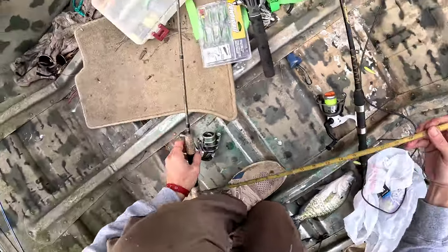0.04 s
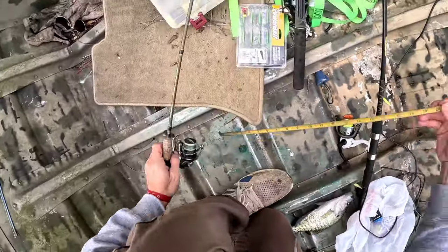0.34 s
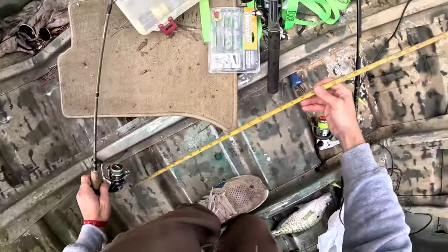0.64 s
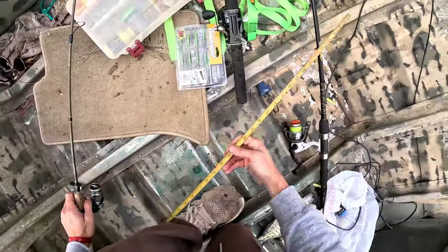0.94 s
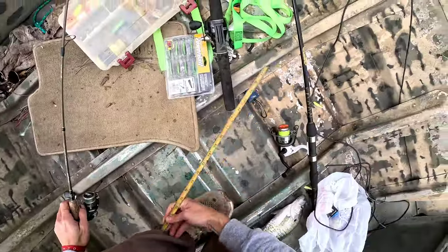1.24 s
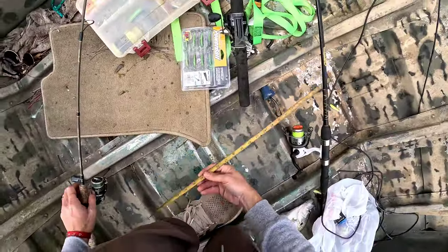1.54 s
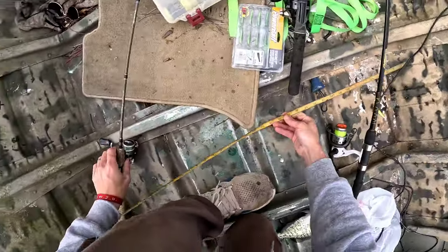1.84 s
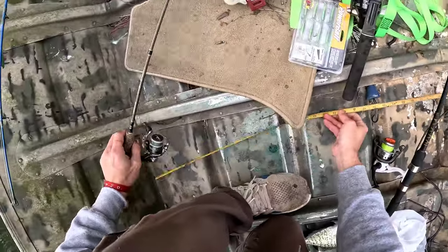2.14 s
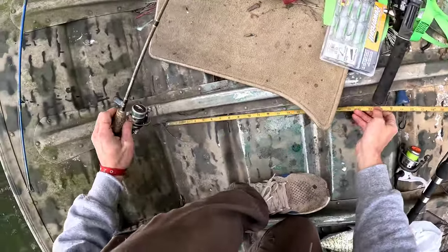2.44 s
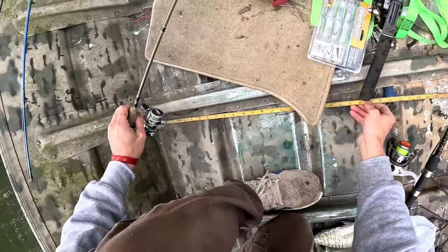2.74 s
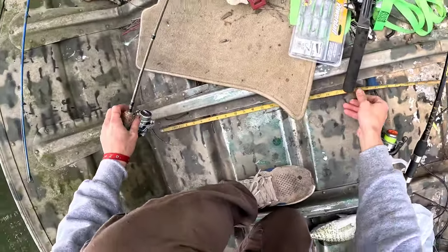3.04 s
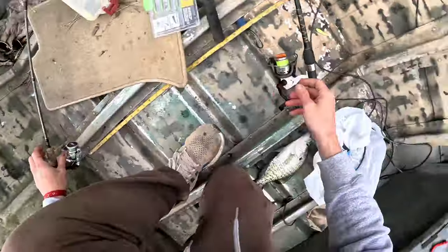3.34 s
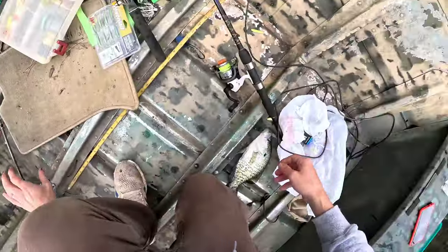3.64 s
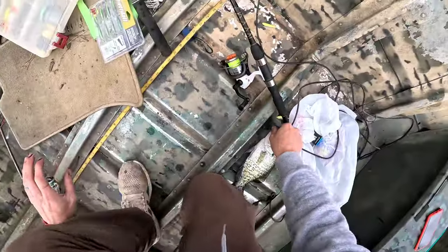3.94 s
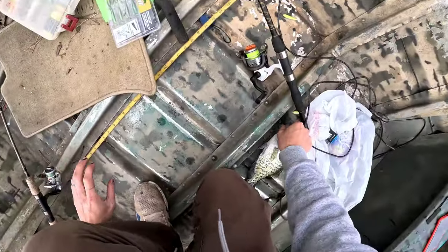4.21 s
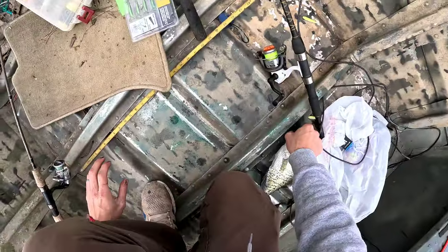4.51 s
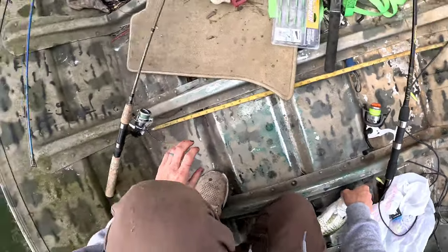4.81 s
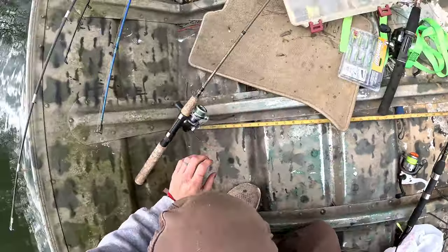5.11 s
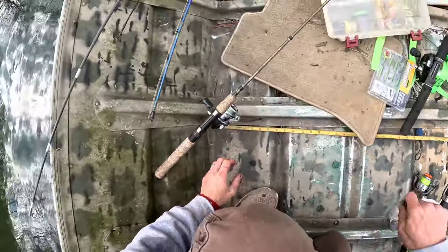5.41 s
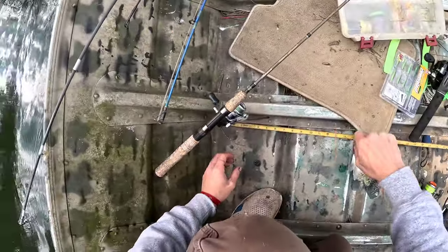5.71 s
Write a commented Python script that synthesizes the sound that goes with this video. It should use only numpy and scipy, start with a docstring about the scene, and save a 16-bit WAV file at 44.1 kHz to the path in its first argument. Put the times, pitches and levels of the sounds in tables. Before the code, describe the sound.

A steel tape measure snaps, buckles and scrapes across a small metal boat's floor, with hollow hull knocks and rustling sleeves.

```python
"""A steel tape measure is handled in a small metal boat, close by, over soft hiss and air rumble.
A far bird whistles first. The blade is pulled out, snapping and buckling in sinking tones; knocks
ring the hull and sleeves rustle. The blade slaps the floor, then scrapes over its ribs and grit.
From about 3 s the snaps thin out, and a rod, a shoe and a knee knock on the hollow hull."""
import sys
import numpy as np
from scipy import signal
from scipy.fft import rfft, irfft
from scipy.io import wavfile
from scipy.ndimage import uniform_filter1d

SR = 44100
rng = np.random.default_rng(int(sys.argv[2]) if len(sys.argv) > 2 else 0)


def persist_wave(psi):
    """Save psi, clipped to +-1, as 16-bit WAV."""
    counts = np.round(np.clip(psi, -1, 1) * 32767).astype(np.int16)
    wavfile.write(sys.argv[1], SR, np.atleast_2d(counts).T)


N = 258426
TIME_S = np.arange(N) / SR
EVENT_S = TIME_S[:SR // 2]

# Table levels are relative; each source adds its own gain.
# background, with two brief dips: (time [s], level [dB])
BACKGROUND = [(0, 4), (2.9, 9), (3.12, 7.5), (3.3, 0.5), (4.8, 7.5), (5.35, -0.5), (5.53, -8.5),
              (5.73, -11.5), (5.76, 3)]
# air rumble spectrum: (frequency [Hz], level [dB])
WIND_EQ = [(10, 5.5), (28, -7.5), (55, -3), (90, -1.5), (300, -25.5), (900, -70)]
# body sways push air at the microphone: (time [s], length [s], level [dB])
SWAYS = [(.5, 0.22, -39.5), (.71, 0.35, -33.5), (1.32, 0.1, -33), (1.75, 0.16, -32), (3.455, 0.022, -31.5),
         (3.55, 0.3, -34), (4.57, 0.27, -43)]
# bird notes: (time [s], length [s], level [dB], start [Hz], middle [Hz], end [Hz])
BIRD_NOTES = [(-.02, .1, -48, 2650, 2650, 3150), (.135, .05, -48, 3020, 2950, 2750),
              (.255, .055, -48, 2720, 2430, 2250)]
# arm movements: (time [s], length [s], level [dB])
SLEEVES = [(1.13, 0.52, -48.5), (1.9, 0.82, -43.5), (2.45, 0.21, -38), (3.23, 0.49, -45.5),
           (3.64, 0.17, -42.5), (3.72, 0.53, -50.5), (4.27, 0.29, -48), (5.72, 0.49, -53)]
# cloth hiss spectrum: (frequency [Hz], level [dB])
RUSTLE_EQ = [(1200, -23), (2800, -3), (5400, -7), (8500, -11.5), (11000, -27), (13500, -29), (16000, -62)]
# narrow resonance in the hiss: (frequency [Hz], width [Hz], level [dB])
RUSTLE_MODES = [(4880, 220, 1)]
# dull rubbing spectrum: (frequency [Hz], level [dB])
RUB_EQ = [(60, 2.5), (150, 5), (300, -0.5), (650, -10), (1150, -6), (2000, -6.5), (3200, -16.5),
          (14000, -62.5)]
# floor panel modes: (multiple of lowest note, level [dB], t60 [s])
PANEL_MODES = [(0.997, 5.5, 0.57), (1.359, -1, 0.38), (1.711, -2, 0.33), (1.973, 0, 0.5), (3.1, -6, 0.24)]
# floor ribs and plates: (frequency [Hz], width [Hz], level [dB])
FLOOR_MODES = [(299, 19.5, 4), (372.5, 29, 0.5), (545.5, 29, -3), (693, 32, -4.5), (925, 59, -4),
               (1013, 17, -2), (1210, 8.3, -3), (1510, 26, -9), (2028, 20, -2)]
# hollow hull plates: (frequency [Hz], width [Hz], level [dB])
HULL_MODES = [(247.4, 15, -1), (409.5, 12, -4), (579, 25, -4), (661, 14, -2), (751, 10, -4),
              (961, 17, -10.5), (1128, 38, -9.5), (1213, 6.5, -8.5)]
# boat's ring after a snap: (frequency [Hz], t60 [s])
BOAT_DECAY = [(300, 1), (3000, 0.053), (14000, 0.021)]
# clear notes of struck or scraped plates: (time [s], frequency [Hz], level [dB], t60 [s])
PLATE_NOTES = [(1, 138, -17.5, 0.21), (.88, 385, -32.5, .9), (1.29, 344, -21.5, 0.22),
               (1.97, 325, -17, 0.17), (2.035, 307, -22, 0.36), (2.038, 950, -19, 0.15),
               (3.7, 258, -27.5, 0.32), (4.766, 570, -21.5, 0.15), (4.81, 236, -22.5, 0.48)]
# rod, shoe and knee on the hull: (time [s], boom [dB], clatter [dB], lowest panel note [Hz])
KNOCKS = [(0.81, -38, -16.5, 126), (0.848, -22, -12.5, 129.8), (0.891, -20, -33, 140.5),
          (1.015, -27, -27, 160.5), (2.83, -20, -13, 143.8), (2.871, -19.5, -15, 122),
          (2.913, -26, -17, 167.3), (2.941, -23, -12.5, 101), (3.676, -26.5, -38, 160.5),
          (3.697, -22, -65, 131.7), (4.278, -33.5, -32, 109.2), (4.452, -44, -21.5, 151.4),
          (4.768, -29, -5.5, 122.3), (4.797, -20.5, -10, 124.1), (4.972, -32, -21, 113),
          (5.091, -44, -22.5, 119.7), (5.146, -39.5, -29, 126.3), (5.76, -46, -29, 174)]
# blade on the floor: (time [s], boom [dB], clatter [dB], lowest panel note [Hz])
SLAPS = [(1.279, -25, -14, 149.8), (1.305, -26, -18, 136.4), (1.638, -35, -20.5, 146.7),
         (1.856, -44, -10, 140), (1.971, -33, -15, 155), (2.043, -31, -8.5, 107.5), (2.21, -23, -22.5, 156),
         (2.376, -25.5, -11.5, 149.3), (2.485, -31, -15, 126.3)]
# blade and gear slide through fingers and over the floor: (time [s], length [s], level [dB])
SLIDES = [(.67, 0.047, -39.5), (.85, 0.092, -44.5), (1.14, 0.54, -45.5), (1.835, 0.017, -30.5),
          (1.99, 0.056, -31), (2.15, 0.19, -41), (2.38, 0.12, -33.5), (4.01, 0.11, -44), (4.15, 0.3, -53)]
# grit spectrum: (frequency [Hz], level [dB])
GRIT_EQ = [(900, -15), (2000, 13), (5000, 11), (9200, 12), (11000, 0), (13000, 2.5), (14800, -39),
           (16000, -39.5)]
# blade, bag and gear edges drag: (time [s], length [s], level [dB], centre [Hz])
RASPS = [(1.344, 0.013, -26.5, 1730), (1.639, 0.029, -31, 1250), (1.676, 0.016, -34, 2110),
         (1.974, .08, -35.5, 2000), (2.383, 0.2, -43, 1870), (2.86, 0.017, -34, 1900),
         (4.403, 0.022, -41, 1400), (5.14, 0.017, -44.5, 1760), (5.362, 0.028, -43, 1404),
         (5.659, 0.013, -56.5, 1520)]
# blade pushed over the ribs: (time [s], length [s], level [dB])
SCRAPES = [(1.98, 0.76, -34.5), (2.16, 0.075, -25), (2.37, 0.12, -30), (2.62, 0.032, -29.5)]
# blade edge and fittings ring: (time [s], centre [Hz], level [dB], t60 [s])
PINGS = [(.911, 8130, -20, .04), (.912, 2040, -33, 0.21), (1.467, 7800, -20, 0.042),
         (1.504, 8000, -18.5, 0.064), (2.577, 6270, -21, .05), (2.877, 2660, -21, 0.057),
         (4.453, 1104, -27, 0.12), (4.767, 3040, -23, 0.16), (5.373, 2440, -28, 0.11)]
# dry edge strikes: (time [s], level [dB], centre [Hz])
CLACKS = [(.794, -18.5, 6000), (1.344, -17, 7500), (1.694, -17.5, 6500), (1.809, -24.5, 5500),
          (2.4628, -16, 6800), (2.579, -27, 7000), (2.887, -18.5, 5200), (2.942, -20.5, 5000),
          (4.451, -22, 4000)]
# blade buckles: (time [s], level [dB], pitch [Hz], length [s], share of pitch lost per length)
FLEXES = [(0.317, -38, 1092, 0.027, 0.15), (0.476, -29.5, 1380, 0.064, 0.31),
          (0.612, -30, 1007, 0.033, 0.069), (0.915, -34, 1682, 0.059, 0.27),
          (1.707, -33.5, 1250, 0.072, 0.08), (1.855, -33.5, 1310, 0.054, 0.048),
          (2.397, -29, 1061, 0.072, 0.11)]
# blade snaps and gear clicks: (time [s], treble [dB], middle [dB])
SNAPS = [(.364, -27, -30.5), (0.389, -35.5, -39.5), (.474, -31, -33), (.591, -24, -33),
         (.606, -23.5, -26.5), (0.677, -22.5, -30.5), (.714, -31, -33.5), (0.806, -30.5, -33),
         (.858, -30.5, -36.5), (.9, -26.5, -27.5), (0.912, -10.5, -24), (1.013, -23, -34),
         (1.045, -27.5, -51), (1.151, -34, -40.5), (1.294, -25, -33), (1.341, -23.5, -20.5),
         (1.359, -18.5, -26), (1.4, -21.5, -25.5), (1.466, -15.5, -28), (1.507, -21.5, -28),
         (1.582, -29.5, -53), (1.695, -12.5, -28.5), (1.832, -24, -30.5), (1.847, -18, -28.5),
         (1.997, -15, -41), (2.38, -13, -24.5), (2.391, -16.5, -32), (2.462, -20.5, -26),
         (2.578, -11, -37.5), (2.61, -23.5, -29.5), (2.663, -28.5, -34), (2.718, -28.5, -35),
         (2.857, -26, -29), (2.875, -35, -17.5), (2.912, -25.5, -25), (2.943, -25.5, -29.5),
         (3.176, -39.5, -42.5), (3.677, -32.5, -33), (4.451, -44, -30), (4.766, -21, -28.5),
         (4.79, -27.5, -30.5), (4.97, -44.5, -46), (5.15, -43, -58), (5.373, -32.5, -45.5),
         (5.751, -29, -43)]
# snap spectrum, treble part: (frequency [Hz], level [dB])
SNAP_TREBLE_EQ = [(1500, -71), (3200, -1), (4500, 3.5), (6000, 9), (8300, 7.5), (9700, 1), (11000, -11),
                  (13300, -8.5), (16000, -52.5)]
# snap spectrum, middle part: (frequency [Hz], level [dB])
SNAP_MIDDLE_EQ = [(150, -2.5), (400, -2.5), (700, -2), (1300, 0.5), (3600, -2), (5000, -5), (15000, -37.5)]
# reflections off the boat's sides: (frequency [Hz], side level [dB])
SIDE_EQ = [(25, -10.5), (120, -20), (500, -12.5), (2000, -8.5), (4000, -7), (8000, -18.5), (12000, -5)]
# stereo balance: (frequency [Hz], left minus right [dB])
BALANCE = [(100, 0.5), (6000, 1), (12000, 2.5)]


def amp(db):
    """dB to gain."""
    return 10 ** (np.asarray(db) / 20)


def unit(x):
    """Scale to rms 1."""
    return x / np.sqrt(np.mean(x ** 2) + 1e-20)


def at_hz(points, hz):
    """Interpolate a table over log frequency."""
    table_hz, value = np.transpose(points)
    return np.interp(np.log(hz + 1), np.log(table_hz + 1), value)


def add(mix, time_s, sound):
    """Mix a sound in at time_s."""
    start = round(time_s * SR)
    sound = sound[max(-start, 0):]
    part = mix[max(start, 0):][:len(sound)]
    part += sound[:len(part)]


def colour(x, eq):
    """Minimum-phase filter; white noise keeps its power."""
    gain = unit(amp(at_hz(eq, abs(np.fft.fftfreq(4096, 1 / SR)))))
    taps = np.fft.ifft(np.exp(np.conj(signal.hilbert(np.log(gain))))).real
    return signal.oaconvolve(x, taps[:len(taps) // 2])[:len(x)]


def bandpass(x, low_hz, high_hz, order=2):
    """Causal band-pass."""
    return signal.lfilter(*signal.butter(order, [low_hz, high_hz], "bandpass", fs=SR), x)


def resonate(x, modes):
    """Sum of parallel resonators."""
    return sum(amp(db) * signal.lfilter(*signal.iirpeak(hz, hz / width_hz, SR), x)
               for hz, width_hz, db in modes)


def rise(rise_s, t=EVENT_S):
    """Exponential onset."""
    return 1 - np.exp(-t / rise_s)


def fade(t60_s):
    """Exponential decay."""
    return np.exp(-np.log(1000) * EVENT_S / max(t60_s, 1e-3))


def held(t, length_s, attack_s, release_s):
    """Attack, hold, release."""
    return rise(attack_s, t) * np.exp(-np.maximum(t - length_s, 0) / release_s)


def strokes(rows, attack_s, release_s):
    """Gain of held movements, summed in power."""
    power = np.zeros(N)
    for time_s, length_s, db in rows:
        add(power, time_s, (amp(db) * held(TIME_S[:2 * SR], length_s, attack_s, release_s)) ** 2)
    return np.sqrt(power)


def waver(depth_db, step_s=.045):
    """Randomly wandering gain."""
    knots_s = np.arange(0, TIME_S[-1] + .1, step_s)
    return amp(depth_db * np.interp(TIME_S, knots_s, rng.standard_normal(len(knots_s))))


def grains(per_s, spread_db):
    """Sparse slips of uneven size, rms 1."""
    size = amp(spread_db * np.minimum(rng.exponential(1, N), 4))
    return unit(size * rng.choice([-1, 1], N) * (rng.random(N) < per_s / SR))


def background(gain_db):
    """Gain of a background noise layer."""
    return amp(gain_db + np.interp(TIME_S, *np.transpose(BACKGROUND)))


def wind(gain_db=-1):
    """Air rumbles at the microphone, more with each body sway."""
    gusts = strokes(SWAYS, attack_s=.014, release_s=.1)
    flow = np.hypot(gusts, background(gain_db=-49.5)) * waver(2.5)
    return amp(gain_db) * unit(colour(rng.standard_normal(N), WIND_EQ)) * flow


def bird():
    """Far, slurred sine whistles."""
    out = np.zeros(N)
    for time_s, length_s, db, *pitch_hz in BIRD_NOTES:
        progress = np.linspace(0, 1, round(length_s * SR))
        hz = np.polyval(np.polyfit([0, .5, 1], pitch_hz, 2), progress)
        add(out, time_s, amp(db) * np.sin(np.pi * progress) * np.sin(2 * np.pi * np.cumsum(hz) / SR))
    return out


def sleeves(gain_db=-1, rub_db=1.5):
    """Cloth catches and lets go: grainy hiss and dull rubbing swell out of the background."""
    hiss, rub = rng.standard_normal((2, N))
    hiss = colour(unit(hiss + .8 * grains(per_s=1500, spread_db=3)), RUSTLE_EQ)
    hiss = hiss + resonate(hiss, RUSTLE_MODES)
    swings = [amp(db) * np.sin(np.pi * np.clip((TIME_S - time_s) / length_s, 0, 1))
              for time_s, length_s, db in SLEEVES]
    arms = amp(gain_db) * np.linalg.norm(swings, axis=0)
    hiss_gain = np.hypot(arms * waver(1.2), background(gain_db=-61.5))
    rub_gain = np.hypot(amp(rub_db) * arms * waver(2.2), background(gain_db=-52.5))
    return hiss * hiss_gain + colour(rub, RUB_EQ) * rub_gain


def plate_notes(rise_s=.015):
    """A plate takes up a blow, swells into one note and rings on, wavering."""
    out = np.zeros(N)
    taper = np.cos(np.pi * EVENT_S / EVENT_S[-1] / 2)
    for time_s, hz, db, t60_s in PLATE_NOTES:
        add(out, time_s, amp(db) * rise(rise_s) * fade(t60_s) * taper * np.sin(2 * np.pi * hz * EVENT_S))
    return out * waver(2.5)


def plates(force, modes, thud_db):
    """Plate modes over a dead thud; each mode's share wanders as the contact moves."""
    force = bandpass(force, 220, 1500)
    return sum(resonate(force * waver(3), [mode]) for mode in modes) + amp(thud_db) * force


def blows(rows, modes, boom_db, clatter_db, t60_s, thud_db, rise_s=.0038):
    """A blow swells into its panel's low modes and rings the plates around it."""
    boom, force = np.zeros((2, N))
    for time_s, low_db, mid_db, hz in rows:
        panel = sum(amp(db) * fade(mode_t60_s) * np.sin(2 * np.pi * (ratio * hz * EVENT_S + rng.random()))
                    for ratio, db, mode_t60_s in PANEL_MODES)
        add(boom, time_s, amp(low_db + boom_db) * panel * rise(rise_s))
        add(force, time_s, amp(mid_db + clatter_db) * rng.standard_normal(len(EVENT_S)) * fade(t60_s))
    return boom + plates(force, modes, thud_db)


def knocks():
    """Heavy things ring the hollow hull."""
    return blows(KNOCKS, HULL_MODES, boom_db=-8, clatter_db=7, t60_s=.26, thud_db=-15)


def slaps():
    """The light blade rings the floor ribs."""
    return blows(SLAPS, FLOOR_MODES, boom_db=-9.5, clatter_db=5, t60_s=.24, thud_db=-12)


def slides():
    """Grit crackles in clumps under blade and gear; their edges catch in ticks."""
    clumps = amp(2.5 * unit(uniform_filter1d(rng.standard_normal(N), size=200)))
    slips = unit(grains(per_s=5000, spread_db=3.5) * clumps)
    catches = grains(per_s=60, spread_db=3.6)
    ticks = signal.oaconvolve(catches, rng.standard_normal(len(EVENT_S)) * fade(.014))[:N]
    return colour(unit(slips + unit(ticks)), GRIT_EQ) * strokes(SLIDES, attack_s=.0054, release_s=.022)


def rasps(edge_ratio=1.32):
    """An edge drags: quick slips through one broad resonance."""
    out = np.zeros(N)
    slips = grains(per_s=3000, spread_db=2.5)
    for time_s, length_s, db, hz in RASPS:
        local_slips = np.roll(slips, -round(time_s * SR))[:len(EVENT_S)]
        drag = unit(bandpass(local_slips, hz / edge_ratio, hz * edge_ratio))
        add(out, time_s, amp(db) * drag * held(EVENT_S, length_s, attack_s=.0017, release_s=.028))
    return out


def scrapes(gain_db=-2):
    """The blade's hook sticks and slips, keeping the floor ringing."""
    slips = grains(per_s=1800, spread_db=1.5)
    ringing = unit(plates(slips, FLOOR_MODES, thud_db=-30))
    return amp(gain_db) * ringing * strokes(SCRAPES, attack_s=.0075, release_s=.0494)


def pings(spread=.078, count=7):
    """Blade edge, rod rings and reel parts each ring a cluster of close modes."""
    out = np.zeros(N)
    for time_s, hz, db, t60_s in PINGS:
        jitter, phase = rng.random((2, count, 1))
        offsets = 2 * (np.arange(count)[:, None] + jitter) / count - 1
        modes = np.sin(2 * np.pi * (hz * (1 + spread * offsets) * EVENT_S + phase))
        add(out, time_s, amp(db) * fade(t60_s) * modes.sum(0) / np.sqrt(count))
    return out


def clacks(edge_ratio=1.31, t60_s=.025, lowpass_hz=10000):
    """A hard edge strikes once: a broad crack, no rattle."""
    out = np.zeros(N)
    for time_s, db, hz in CLACKS:
        noise = rng.choice([-1., 1.], len(EVENT_S))
        crack = unit(bandpass(noise, hz / edge_ratio, hz * edge_ratio, order=1))
        add(out, time_s, amp(db) * crack * fade(t60_s))
    return signal.lfilter(*signal.butter(4, lowpass_hz, fs=SR), out)


def flexes(fall_db=9, flutter_hz=250):
    """A kink runs along the blade: a fluttering tone sinks and dies over two lengths."""
    out = np.zeros(N)
    for time_s, db, hz, length_s, sink in FLEXES:
        age = np.minimum(EVENT_S / length_s, 2)
        noise = np.array([1, 1j]) @ rng.standard_normal((2, len(EVENT_S)))
        flutter = signal.lfilter(*signal.butter(2, flutter_hz, fs=SR), noise)
        glide = np.exp(2j * np.pi * np.cumsum(hz * (1 - sink * age)) / SR)
        tone = ((.5 + 1.2 * flutter / np.std(flutter)) * glide).real
        envelope = rise(.002) * amp(db + fall_db * (1 / 3 - age ** 2)) * (2 - np.maximum(age, 1))
        add(out, time_s, tone * envelope)
    return out


def boat_response():
    """The boat's dense ring, energy 1; high bands die first."""
    hz, t, spectrum = signal.stft(rng.standard_normal(len(EVENT_S)), SR, nperseg=128)
    decay = amp(-60 * t / at_hz(BOAT_DECAY, hz)[:, None])
    tail = signal.istft(spectrum * decay, SR)[1][:len(EVENT_S)]
    return tail / np.linalg.norm(tail)


def rebounds(gap_s, loss_db, count=4):
    """Impulses of a contact and its uneven, fading rebounds, energy 1."""
    train = np.zeros(len(EVENT_S) // 4)
    times_s = np.concatenate([[0], np.cumsum(gap_s * rng.uniform(.4, 1.6, count))])
    train[(times_s * SR).astype(int)] = amp(-loss_db * np.sqrt(np.arange(count + 1)))
    return train / np.linalg.norm(train)


def snaps(treble_db=-8, middle_db=3, rattle_db=3.5, boat_db=-10, crack_t60_s=.021, shimmer_t60_s=.064):
    """The steel cracks, rattles and shimmers; the boat rings after it."""
    treble, middle = np.zeros((2, N))
    for time_s, high_db, mid_db in SNAPS:
        high_noise, mid_noise, rattle = rng.standard_normal((3, len(EVENT_S)))
        # bright snaps hit hard; dull ones glance and build more slowly
        hardness = np.clip((high_db - mid_db + 4) / 8, 0, 1)
        onset = rise(.0023 * (1 - hardness) + 1e-4)
        chatter = onset * unit(amp(rattle_db * unit(uniform_filter1d(rattle, size=90))))
        # the wave's round trip along the blade colours each snap
        echo = np.zeros(rng.integers(15, 130))
        echo[0], echo[-1] = 1, .55
        bounces = np.convolve(echo, rebounds(gap_s=.0065, loss_db=12.7))
        shimmer = high_noise * (hardness * fade(crack_t60_s) + chatter * fade(shimmer_t60_s))
        body = mid_noise * chatter * fade(1.74 * shimmer_t60_s)
        add(treble, time_s, amp(high_db + treble_db) * signal.fftconvolve(shimmer, echo))
        add(middle, time_s, amp(mid_db + middle_db) * signal.fftconvolve(body, bounces))
    direct = colour(treble, SNAP_TREBLE_EQ) + colour(middle, SNAP_MIDDLE_EQ)
    return direct + amp(boat_db) * signal.oaconvolve(direct, boat_response())[:N]


def scene(right_lag_s=9e-6):
    """Near-centre mix, widened by reflections off the boat's sides and a tiny lag."""
    mono = (snaps() + clacks() + knocks() + slaps() + plate_notes() + flexes() + pings()
            + scrapes() + rasps() + slides() + sleeves() + wind() + bird())
    hz = np.fft.rfftfreq(N, 1 / SR)
    reflections = rfft(rng.standard_normal(len(EVENT_S)) * fade(.07), N)
    side = reflections / abs(reflections) * amp(at_hz(SIDE_EQ, hz))
    balance = amp(at_hz(BALANCE, hz) / 2)
    left = (1 + side) * balance
    right = (1 - side) / balance * np.exp(-2j * np.pi * hz * right_lag_s)
    return irfft(rfft(mono) * np.array([left, right]), N)


def record(dry):
    """Soft clip, then low-pass."""
    ceiling, cutoff_hz = .55, 16000
    rounded = ceiling * np.tanh(dry / ceiling)
    taps = signal.firwin(511, cutoff_hz, window=("kaiser", 9), fs=SR)
    return signal.oaconvolve(rounded, taps[None], "same")


dry = scene()
out = record(dry)
persist_wave(out)
```